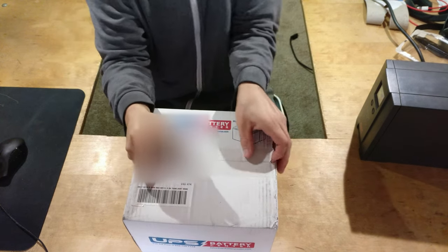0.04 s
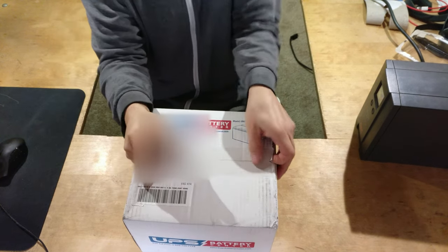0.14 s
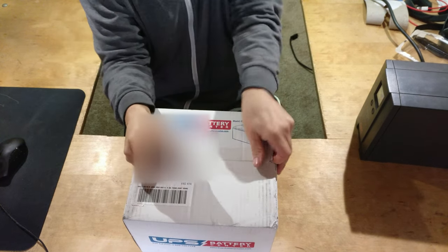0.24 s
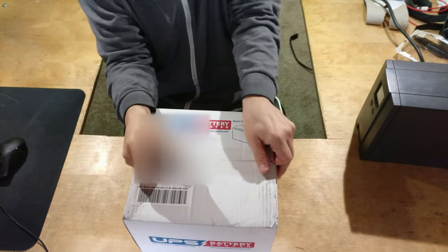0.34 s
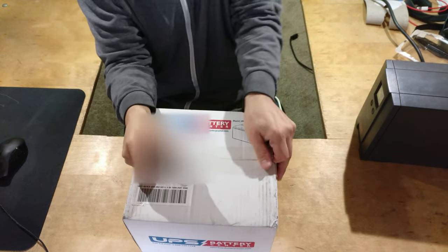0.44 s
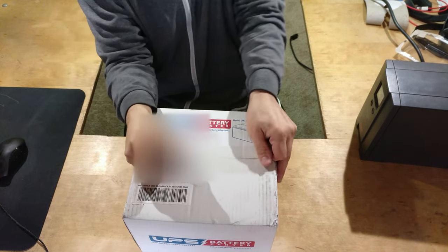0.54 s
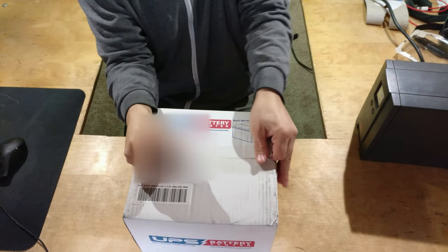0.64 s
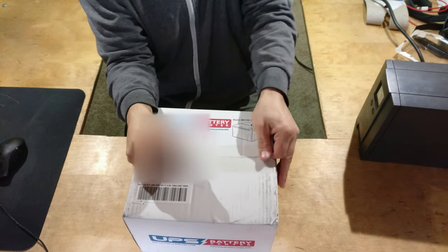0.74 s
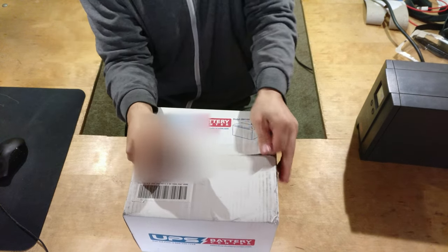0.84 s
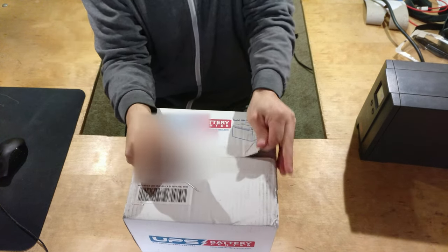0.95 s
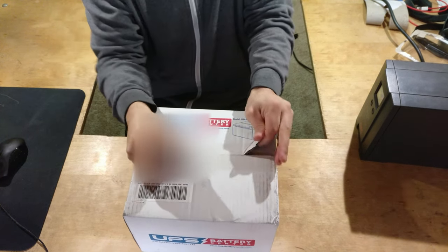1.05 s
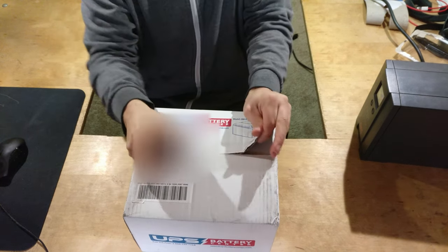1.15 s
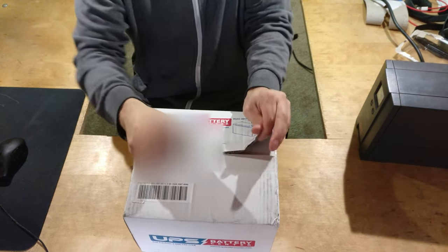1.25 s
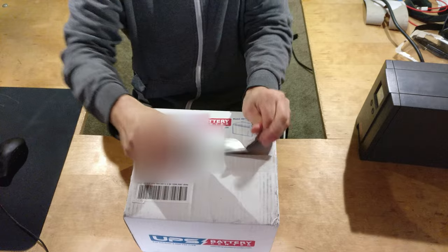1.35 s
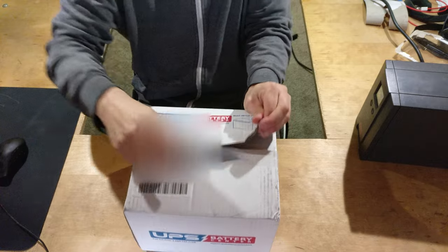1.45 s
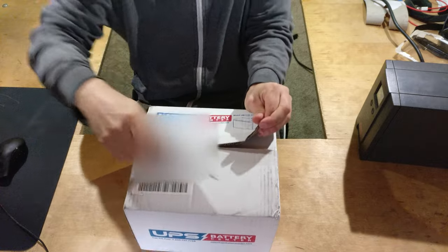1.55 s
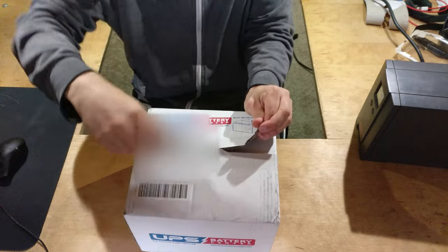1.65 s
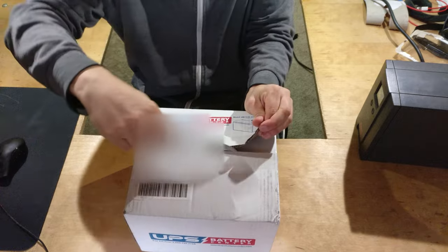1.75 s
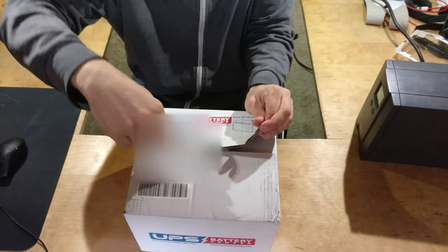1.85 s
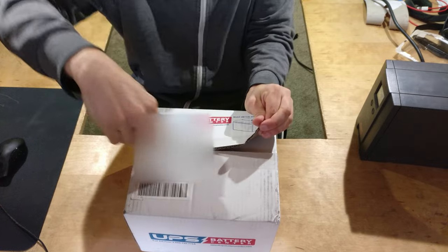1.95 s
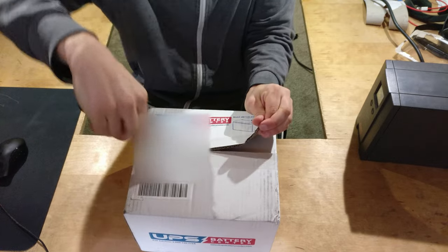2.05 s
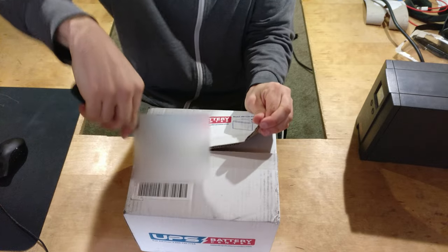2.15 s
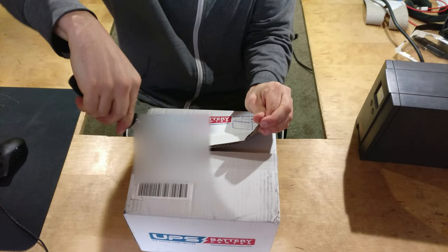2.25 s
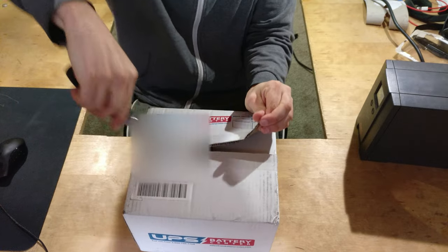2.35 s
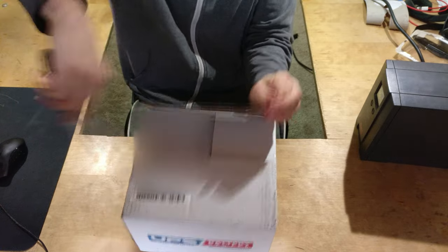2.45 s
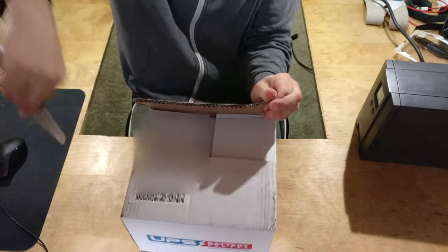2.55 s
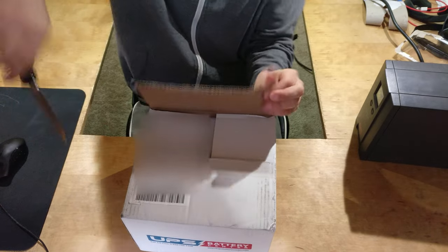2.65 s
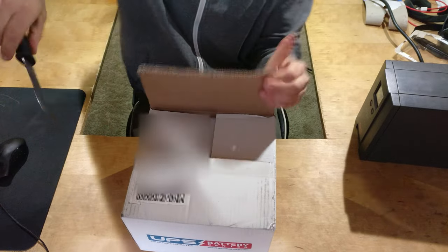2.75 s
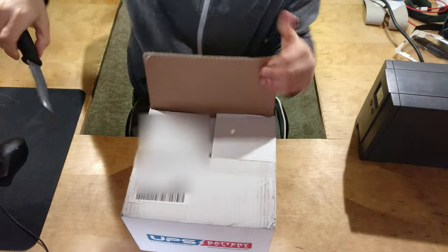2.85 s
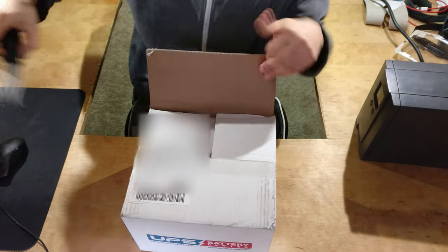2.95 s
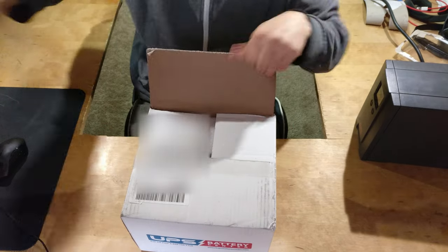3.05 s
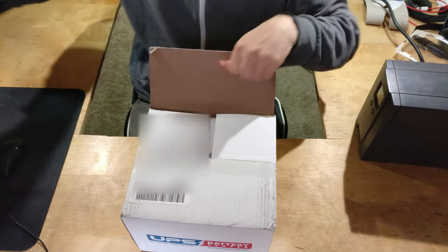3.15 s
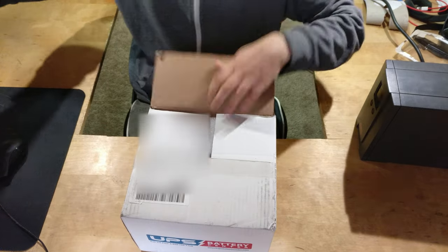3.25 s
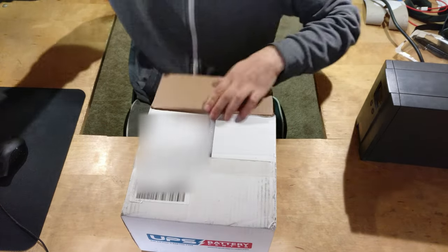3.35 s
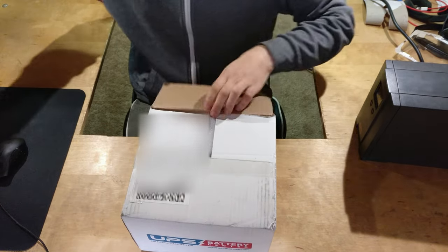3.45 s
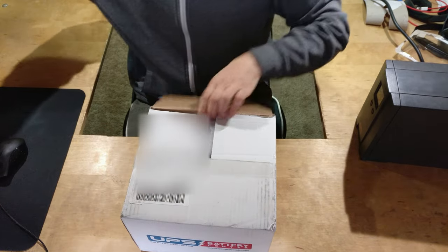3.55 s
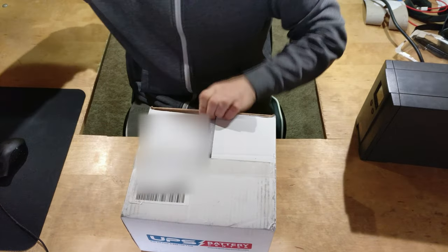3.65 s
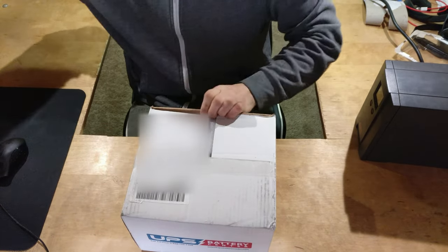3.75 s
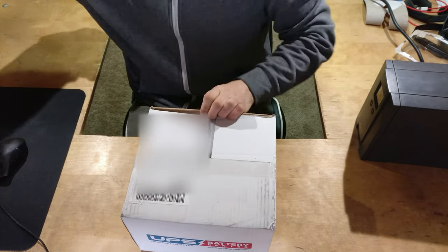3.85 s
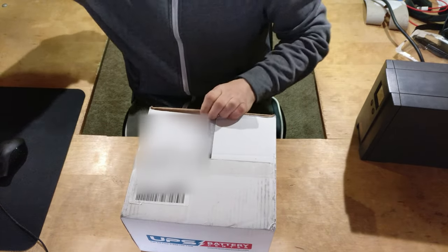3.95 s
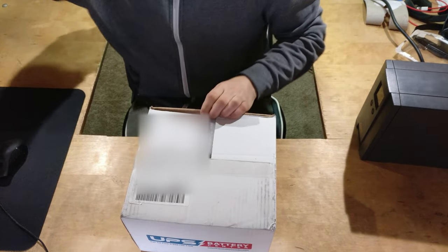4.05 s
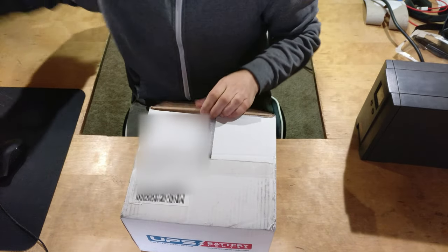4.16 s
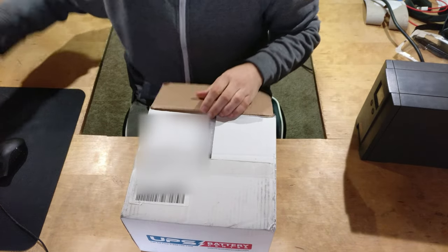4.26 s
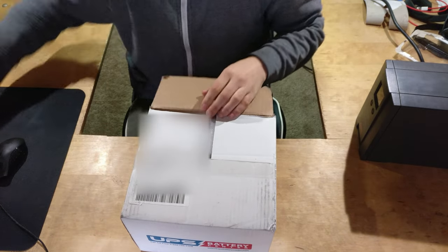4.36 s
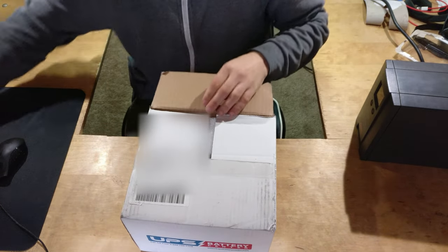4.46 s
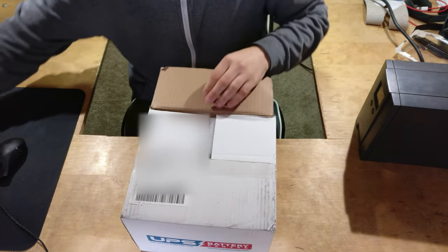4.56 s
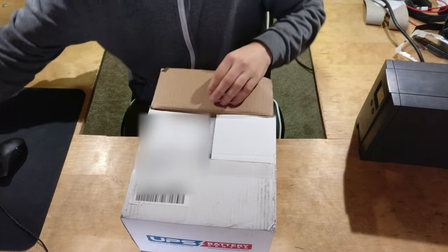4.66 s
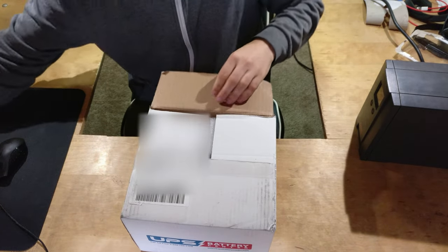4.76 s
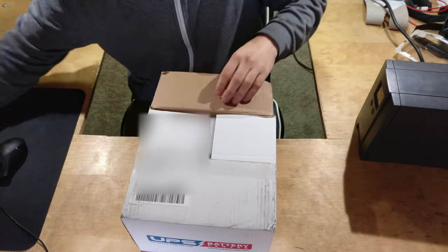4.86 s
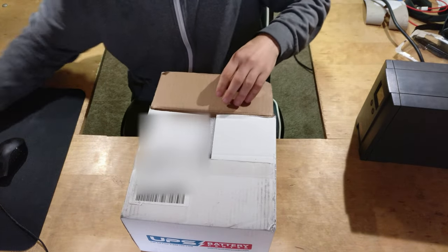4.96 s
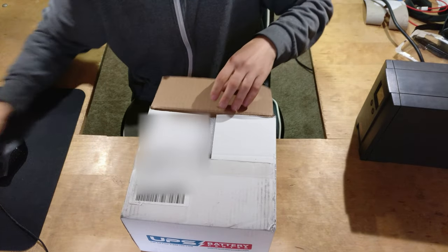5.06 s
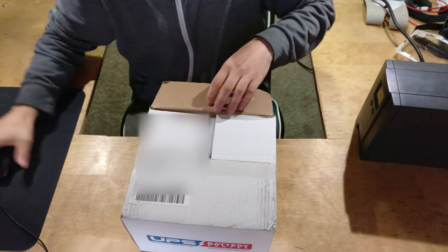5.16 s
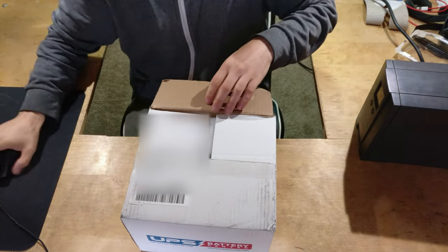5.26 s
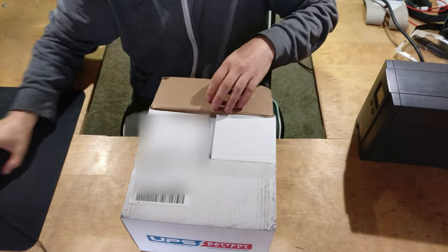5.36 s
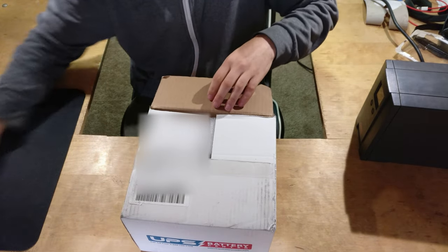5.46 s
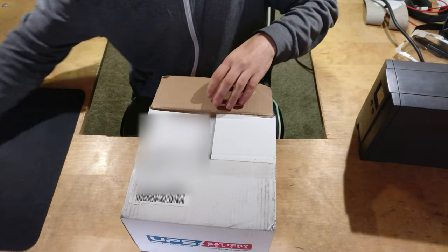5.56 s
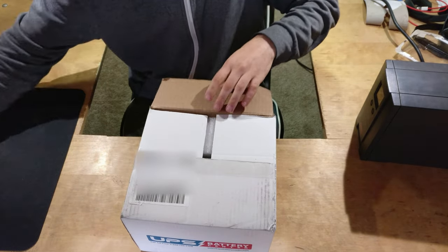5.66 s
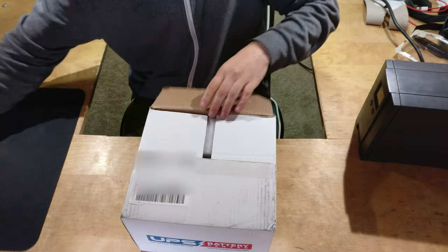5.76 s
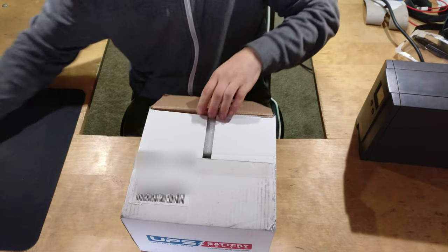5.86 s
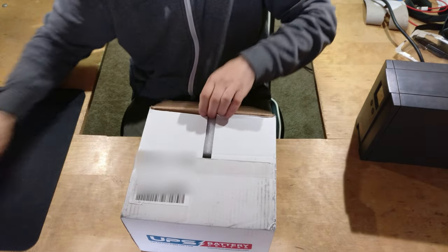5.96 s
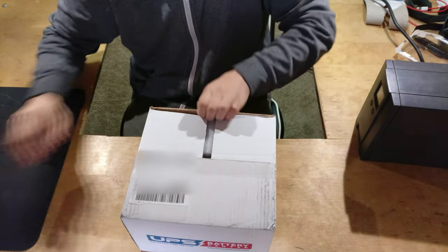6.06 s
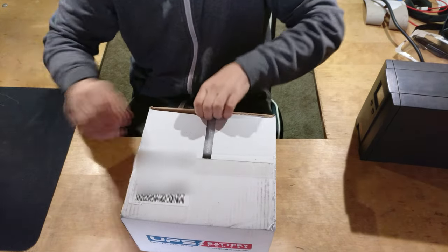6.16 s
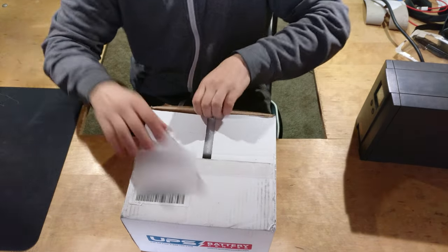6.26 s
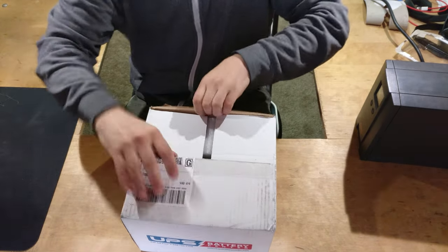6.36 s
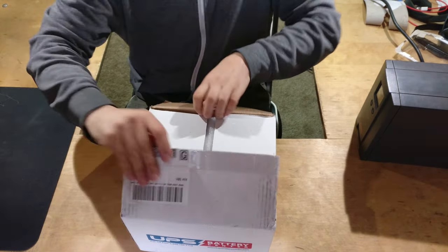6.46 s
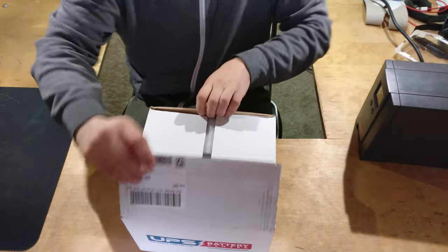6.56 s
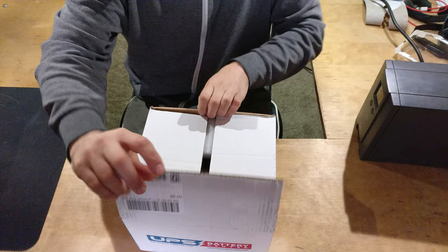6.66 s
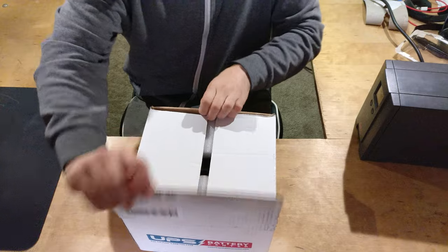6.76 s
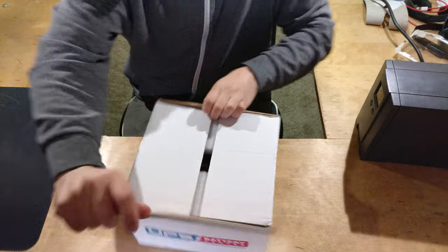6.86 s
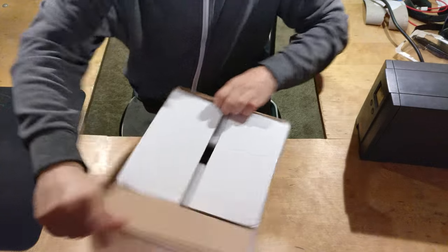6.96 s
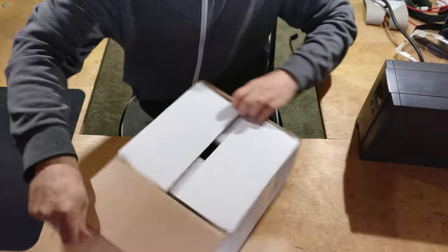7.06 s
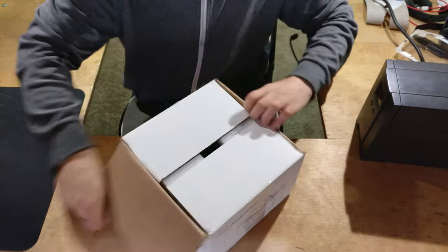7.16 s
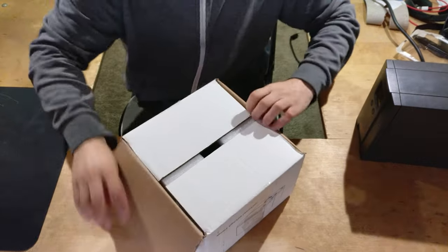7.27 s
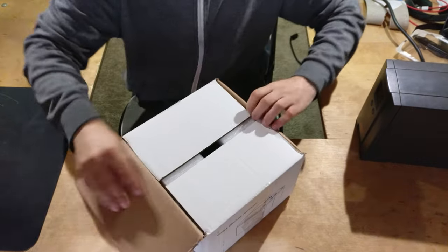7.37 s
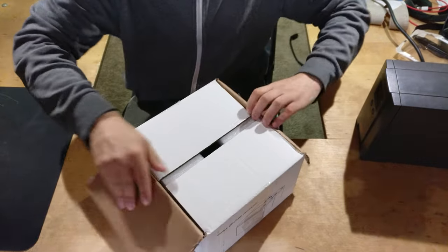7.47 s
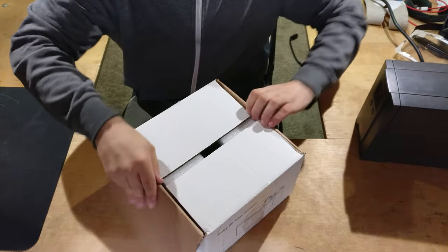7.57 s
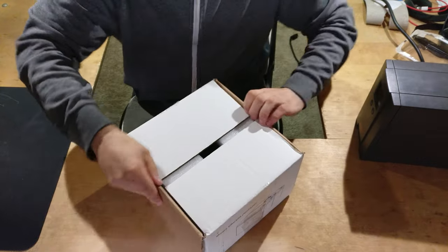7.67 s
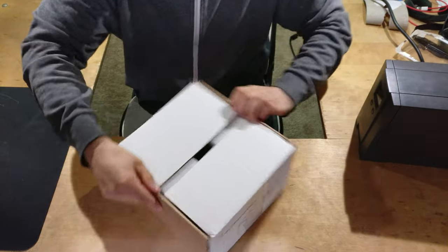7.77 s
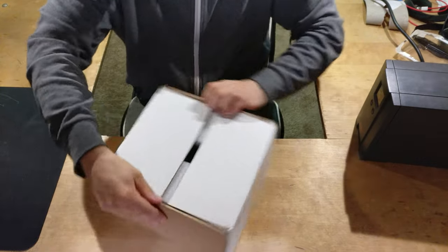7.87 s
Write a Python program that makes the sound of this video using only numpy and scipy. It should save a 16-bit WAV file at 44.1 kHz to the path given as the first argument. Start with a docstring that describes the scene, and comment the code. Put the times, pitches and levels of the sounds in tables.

```python
"""A faint hum and soft rubs over card come first; then hands tear and cut the tape of a box on a table.
Stick-slip friction of tape, blade and fingers makes dense clicks, a card-edge rasp and shaken walls.
Bumps excite the decaying modes of the hollow box and table; fibres and glue spots snap in short rings.
A small quiet room adds a short diffuse tail, and a thin tone fades in and out in a quiet stretch."""
import sys
import numpy as np
from scipy import signal
from scipy.fft import rfft, irfft
from scipy.io import wavfile
from scipy.ndimage import uniform_filter1d

SR = 44100
rng = np.random.default_rng(int(sys.argv[2]) if len(sys.argv) > 2 else 0)


def generate_wav(sig):
    """Save sig (samples, or channels by samples) to the path in sys.argv[1] as 16-bit PCM at SR."""
    pcm = np.round(np.clip(np.atleast_2d(sig).T, -1, 1) * 32767).astype(np.int16)
    wavfile.write(sys.argv[1], SR, pcm)


N = 349254
T = np.arange(N) / SR  # s
HZ = np.maximum(np.arange(N // 2 + 1) * SR / N, 1)  # spectrum bins


def undb(db):
    """Decibel law: amplitude gain of a level in dB."""
    return 10 ** (np.asarray(db) / 20)


def level(x, db):
    """Root-mean-square normalisation: scale to an rms level in dB."""
    return x * undb(db) / np.sqrt(np.mean(x ** 2))


def colour(x, points, scale=0.81):
    """Spectral shaping: scaled (pitch_hz, level_db) points are joined on a log-frequency axis."""
    hz, db = np.transpose(points)
    gain_db = scale * np.interp(np.log(HZ), np.log(hz), db)
    return irfft(rfft(x) * undb(gain_db), N)


def walk(rate):
    """Slow random modulation: levels drawn at a rate in Hz and joined by slews, spread near 1."""
    hold = int(SR / rate)
    steps = np.repeat(rng.standard_normal(N // hold + 1), hold)
    return 1.3 * uniform_filter1d(steps, hold)[:N]


def paths(size, alike):
    """Partial coherence: noise from a wide surface reaches the two ports only partly alike."""
    shared = rng.standard_normal(size)
    return alike * shared + np.sqrt(1 - alike ** 2) * rng.standard_normal((2, size))


def ring(gains, modes, t):
    """Modal superposition: a sum of decaying sines, the lows taking longer to build up."""
    hz, db, t60 = modes[:, :, None]
    build_up_cycles = np.where(hz < 150, 2.5, .6)
    swell = 1 - np.exp(-t * hz / build_up_cycles)
    decay = 1000. ** (-t / t60)
    sines = np.sin(2 * np.pi * hz * t)
    return np.sum(gains[:, None] * undb(db) * swell * decay * sines, axis=0)


HUM_HZ, HUM_DB = 118.4, -77.5  # rms before it wavers
AIR_DB = -69  # rms
# Spectrum of the room air: pitch_hz, level_db (relative, before the scale in colour)
AIR_SPECTRUM = [(18, -63.5), (40, -13.5), (118, -2.5), (179, -22), (280, -21), (461, -30.5), (889, -37),
                (1500, -36.5), (16000, -51.5)]


def quiet_room():
    """Background noise: air noise, coherent between ports in the bass, and a wavering tonal hum."""
    mid, side = (colour(rng.standard_normal(N), AIR_SPECTRUM) for _ in range(2))
    side = colour(side, [(200, -17.0), (2000, -1.0)])
    left_right = mid + side * np.array([[1], [-1]])
    air = level(left_right * undb(1.1 * walk(4.5)), AIR_DB)
    hum = level(np.sin(2 * np.pi * HUM_HZ * T), HUM_DB)
    return air + hum * undb(2.0 * walk(8.5))


TONE_HZ, TONE_WIDTH_HZ, TONE_DB = 1400, 65, -84  # rms before the fades
TONE_START_S, TONE_END_S = 4.22, 4.98


def thin_tone():
    """Resonant filtering: a narrow band of noise is heard as a thin tone that fades in and out."""
    peak = signal.iirpeak(TONE_HZ, TONE_HZ / TONE_WIDTH_HZ, fs=SR)
    band = signal.lfilter(*peak, rng.standard_normal(N))
    fade = np.clip(20 * np.minimum(T - TONE_START_S, TONE_END_S - T), 0, 1)
    return level(band, TONE_DB) * fade


ROOM_T60_S, ROOM_DB = 0.11, -5.5


def room(x):
    """Diffuse reverberation: each port gets its own decaying noise tail, mostly above the bass."""
    t = T[:SR // 4]
    tail = rng.standard_normal((2, len(t))) * 1000. ** (-t / ROOM_T60_S)
    tail = tail * (t > .0008)  # the reflections follow the direct sound
    tail = signal.sosfilt(signal.butter(1, 500, "high", fs=SR, output="sos"), tail)
    tail = tail / np.sqrt(np.sum(tail ** 2, axis=1, keepdims=True))
    return undb(ROOM_DB) * signal.fftconvolve(x[None], tail, axes=1)[:, :N]


# Snapping fibres and glue spots: start_s, level_db (peak of the ring, without the tick), pitch_hz, t60_s
SNAPS = [(0.9495, -24, 7100, 0.006), (1.272, -31, 1600, 0.012), (1.285, -32, 1720, 0.0052),
         (1.5345, -24, 1884, 0.017), (2.198, -24, 1700, 0.011), (2.241, -26.5, 1510, 0.036),
         (2.5155, -5, 7460, 0.0027), (2.516, -13.5, 1923, 0.035), (3.213, -36, 2230, 0.015),
         (4.254, -55, 751, 0.017), (4.476, -61, 1406, 0.016), (5.294, -55, 1700, 0.02),
         (6.622, -29, 1980, 0.026), (6.633, -25.5, 2070, 0.023)]


def snaps():
    """Sudden release: the card gives way in a tick and rings roughly and briefly around it."""
    out, t = np.zeros((2, N + SR)), T[:SR // 16]
    for start_s, db, hz, t60 in SNAPS:
        give = paths(len(t), 0.83) * np.exp(-t / (0.12 * t60))
        card = 1000. ** (-t / t60) * np.sin(2 * np.pi * hz * t)
        sound = signal.fftconvolve(give, card[None], axes=1)[:, :len(t)]
        tick = 0.19 * paths(len(t), 0.9) * np.exp(-t / 0.0005)
        sound = sound / np.abs(sound).max() + tick
        start = int(start_s * SR)
        out[:, start:start + len(t)] += undb(db) * sound
    return out[:, :N]


# Modes of box and table, air and table below 400 Hz, card panels above:
# pitch_hz (nominal), level_db (relative), t60_s (for bumps; rubbing shortens it)
BODY = [(47.4, -11, 0.3), (61, -2.5, 0.3), (88.2, -7.5, 0.27), (107.53, 3, 0.29), (140, -13.5, 0.13),
        (193, -4.5, 0.11), (239, 1, 0.065), (296.6, -7, 0.067), (442, -8.5, 0.068), (505, -5.5, 0.045),
        (583, -1.5, 0.045), (647, -1.5, 0.045), (796, -8.5, 0.044), ]


def box_modes():
    """Modal description: a fresh copy of the pitches, levels and decays of the box and table."""
    return np.array(BODY, dtype=float).T


CRACK_DB, CRACK_PER_PANEL = -24.5, 1  # a blow that rings the panels also cracks
# Bumps of the box: start_s, thud_db (peak before the stop), panel_db (ring peak above the thud, before
# the stop), stop_s (time after the start at which the ring drops), pitch_hz (centre of the thud)
BUMPS = [(0.68, -46.5, -5.5, 0.044, 190), (0.732, -42.5, 0, 0.061, 189.3), (0.91, -10, -3.5, 0.019, 200),
         (0.946, -26, -12, 0.021, 167.5), (1.027, -44.5, -14, 0.091, 170), (1.174, -33, 4, 0.059, 190),
         (1.265, -33, -13, 0.027, 195), (1.535, -32, 5.5, 0.022, 169), (1.703, -46.5, -16, 0.048, 197),
         (1.862, -11, -9.5, 0.035, 199), (1.907, -16, -3, 0.099, 174.6), (2.049, -24.5, -27, 0.17, 181),
         (2.115, -19, -6.5, 0.16, 180.6), (2.142, -10.5, -17, 0.041, 193), (2.168, -17.5, -5, 0.23, 177),
         (2.199, -19.5, -13, 0.099, 180), (2.236, -18.5, -19, 0.091, 118.5), (2.304, -25, -15, 0.26, 162),
         (2.422, -20.5, -18, 0.16, 183.7), (2.446, -13.5, 1, 0.19, 206.8), (2.514, -9, -0.5, 0.18, 152.2),
         (2.539, -11, -2, 0.11, 106), (2.747, -39, 1.5, 0.056, 139), (3.184, -25.5, -12.5, 0.048, 100),
         (3.213, -19.5, -7, 0.026, 300), (3.385, -28, -7, 0.096, 105), (3.397, -26.5, -24, 0.068, 160),
         (3.633, -31, -4, 0.042, 133), (4.805, -30, -25, 0.075, 240), (4.826, -25, -32.5, 0.084, 146),
         (5.179, -58, -12, 0.05, 140.8), (5.293, -48, -20.5, 0.15, 85.3), (5.776, -29, -37, 0.14, 196),
         (6.092, -49, -5, 0.094, 121), (6.404, -29, 2, 0.045, 106), (6.457, -17.5, -20, 0.014, 100),
         (6.568, -23.5, -7, 0.1, 109), (6.616, -24.5, 1, 0.11, 116), (6.638, -32, 2, 0.017, 109),
         (6.649, -22.5, -24.5, 0.055, 62.7), (7.059, -28, 1.5, 0.093, 100), (7.41, -25, -3.5, 0.019, 105),
         (7.572, -26.5, -10, 0.08, 104.6), (7.797, -39.5, 2, 0.026, 201)]


def bumps():
    """Modal impact: a blow favours low modes near its centre, crunches the panels and cracks the card."""
    out, t = np.zeros((2, N + SR)), T[:SR // 4]
    for start_s, thud_db, panel_db, stop_s, centre_hz in BUMPS:
        modes = box_modes()
        count = modes.shape[1]
        low, deep = modes[0] < 400, modes[0] < 125
        # hands and open flaps retune the panels from blow to blow
        modes[0] *= 1 + np.where(low, .012, .04) * rng.standard_normal(count)
        chance = undb(np.where(low, 1.5, 2.2) * rng.standard_normal(count))
        chance = chance * np.where(low, 1, rng.choice([-1, 1], count))
        near = undb(-9 * np.abs(np.log2(modes[0] / centre_hz)))
        # soft blows hardly reach the highest panel modes
        chance = chance * undb(0.7 * min(panel_db, 0) * (modes[0] > 750))

        # the hand keeps rocking the walls for a moment; the deepest modes only feel the blow
        hand = uniform_filter1d(rng.standard_normal(len(t)), SR // 600)
        rocking = (t == 0) + 0.035 * hand * np.exp(-t / 0.048)
        thud = signal.fftconvolve(rocking, ring(chance * near * (low & ~deep), modes, t))[:len(t)]
        thud = thud + ring(chance * near * deep, modes, t)

        # the card gives way over some ms, so the panels are driven by a rough burst
        crunch = paths(len(t), 0.84) * (np.exp(-t / 0.0033) + 0.3 * np.exp(-t / 0.022))
        panel_ring = ring(chance * ~low, modes, t)
        panel = signal.fftconvolve(crunch, panel_ring[None], axes=1)[:, :len(t)]

        crack_decay = np.exp(-t / 0.00058) + 0.052 * np.exp(-t / 0.039)
        crack = np.diff(paths(len(t) + 1, 0.88)) * crack_decay
        crack_db = CRACK_DB + CRACK_PER_PANEL * panel_db

        sound = thud / np.abs(thud).max() + undb(panel_db) * panel / np.abs(panel).max()
        sound = sound + undb(crack_db) * crack
        # the ring dies suddenly to a faint rest
        stopped = 0.027 + 0.54 / (1 + np.exp((t - stop_s) / 0.0019))
        fade_out = np.minimum(1, 20 * (t[-1] - t))
        start = int(start_s * SR)
        out[:, start:start + len(t)] += undb(thud_db) * sound * stopped * fade_out
    return out[:, :N]


TEAR_DB_PER_S = 799.5
# Tape and card letting go: start_s, level_db (peak force), top_db (treble above 7500 Hz, relative)
TEARS = [(0.45, -56, -0.5), (0.873, -56, -3.5), (0.911, -25, 4.5), (0.948, -37.5, 6.5), (1.262, -42.5, -15),
         (1.361, -46, -2.5), (1.451, -45, -5), (1.497, -56.5, 12), (1.532, -33.5, 2), (1.861, -51.5, -22),
         (1.909, -48.5, -20), (2.116, -48.5, -7), (2.197, -39, 6), (2.307, -46.5, -1), (2.422, -35, 0),
         (2.442, -27, 0), (2.507, -28.5, -8), (2.514, -20.5, -5), (2.747, -49, -5), (3.211, -57, 8),
         (3.377, -52.5, -11.5), (3.767, -52.5, 5), (6.405, -49.5, -10), (6.456, -43.5, -1),
         (6.619, -55, 11), (6.78, -59.5, 29.5), (6.956, -50.5, -6), (7.059, -35.5, -4), (7.407, -46, -5),
         (7.797, -53, -17)]


def tears():
    """Sudden failure: the force peaks at once, then decays exponentially."""
    for start_s, db, top_db in TEARS:
        now = slice(int(start_s * SR), int(start_s * SR) + SR // 8)
        yield now, undb(db - TEAR_DB_PER_S * (T[now] - start_s)), top_db


SWELL_DB, SWELL_SHARE, RELEASE_DB_PER_S = 14, 0.41, 498  # share of the rub's duration
# Tape, blade and fingers dragged over the card: start_s, end_s, level_db (held force),
# top_db (treble above 7500 Hz, relative)
RUBS = [(0.113, 0.229, -66, 3.5), (0.259, 0.332, -58.5, -1), (0.384, 0.645, -72.5, -5),
        (1.032, 1.094, -61, -6), (1.16, 1.232, -48, -3), (1.259, 1.291, -40.5, 1.5),
        (1.501, 1.539, -51, -11), (1.97, 2.173, -58, -2.5), (2.164, 2.256, -41.5, 1),
        (2.315, 2.341, -49.5, -1.5), (2.385, 2.41, -56.5, -2), (2.436, 2.533, -35.5, -5.5),
        (2.5, 2.572, -41, -13.5), (2.614, 2.663, -62.5, -7), (2.92, 3.157, -73, -4),
        (3.166, 3.265, -54.5, -7), (3.254, 3.293, -46.5, 4), (3.321, 3.376, -60.5, 1),
        (3.375, 3.4, -54.5, 0), (3.439, 3.495, -61.5, 5), (3.598, 3.696, -60.5, -1),
        (3.688, 3.737, -54, 0.5), (3.738, 3.837, -63.5, 2.5), (4.16, 4.486, -75, 2), (4.742, 4.916, -73, 1),
        (5.146, 5.35, -76.5, 1), (5.606, 5.677, -83, -13), (5.755, 5.838, -75, -3),
        (5.914, 6.059, -67.5, 2), (6.078, 6.122, -66, -3.5), (6.382, 6.498, -56, -3.5),
        (6.519, 6.64, -57.5, -2.5), (6.61, 6.627, -38.5, -5.5), (6.736, 6.777, -60, -4),
        (6.784, 6.965, -63.5, 0.5), (6.913, 7.066, -59, 2.5), (7.014, 7.254, -51.5, 1),
        (7.284, 7.417, -51, 5), (7.472, 7.616, -61, 0), (7.624, 7.794, -64, -7.5), (7.795, 7.933, -49, 1.5)]


def rubs():
    """Sliding contact: the force of a rub swells, holds, then lets go."""
    for start_s, end_s, db, top_db in RUBS:
        now = slice(int(start_s * SR), int(end_s * SR) + SR // 8)
        swell = np.maximum(1 - (T[now] - start_s) / (SWELL_SHARE * (end_s - start_s)), 0)
        release_s = np.maximum(T[now] - end_s, 0)
        yield now, undb(db - SWELL_DB * swell - RELEASE_DB_PER_S * release_s), top_db


def pressure():
    """Superposed contact forces: forces add, and the brightness is their force-weighted mean in dB."""
    force, top = np.full(N, 1e-6), np.zeros(N)
    for strokes in (tears(), rubs()):
        for now, push, top_db in strokes:
            force[now] += push
            top[now] += push * top_db
    force, bright = uniform_filter1d(np.array([force, undb(top / force)]), SR // 350)  # set in within 3 ms
    fade = np.exp(-1 / (0.013 * SR))
    lingering = signal.lfilter([1 - fade], [1, -fade], force)
    return np.maximum(force, 0.42 * lingering), bright  # strokes let go more slowly


# How the strokes bear on the box: start_s, push_db (on the walls), rasp_db (of the card edge), both relative
GRIP = [(0, -2, -6), (1.1, -5.5, -3), (1.9, -9, -3.5), (2.0, 12, -9), (2.4, 10.5, -3), (2.5, 2, -7),
        (6.4, 2, -3), (6.9, -4, -1.5), (7.75, -4, -2), (7.84, -14.5, 1.5)]


def grip():
    """Contact coupling: slowly changing gains of the push on the walls and of the card-edge rasp."""
    start_s, push_db, rasp_db = np.transpose(GRIP)
    return undb(np.interp(T, start_s, push_db)), undb(np.interp(T, start_s, rasp_db))


def patchy(x):
    """Independent band modulation: each octave swells alone as the contact moves over the fibres."""
    out, rest = 0, x
    for hz in 800 * 2 ** np.arange(5):
        band = signal.sosfilt(signal.butter(1, hz, fs=SR, output="sos"), rest)
        out = out + band * undb(2.4 * walk(16))
        rest = rest - band
    return out + rest


# Spectrum of the scraped card: pitch_hz, level_db (relative, before the scale in colour)
SCRAPE_SPECTRUM = [(240, -20), (400, -11.5), (636, -8.5), (964, -9), (1900, -2), (2510, -7), (4800, -8.5),
                   (9470, -18.5), (12500, -23), (16000, -18)]


def slipping(bright):
    """Stick-slip friction: dense clicks of uneven size in uneven bursts hiss directly."""
    sizes = undb(4.5 * np.minimum(rng.exponential(size=N), 3.5))
    clicks = (rng.random(N) < 1200 / SR) * sizes  # 1200 per s on average
    slips = level(clicks * paths(N, 0.61), 0) + 1.1 * paths(N, 0.6)
    slips = patchy(colour(slips, SCRAPE_SPECTRUM)) * undb(2.0 * walk(110))
    top = signal.sosfiltfilt(signal.butter(3, 7500, "high", fs=SR, output="sos"), slips)
    return level(slips - top, 1.8) + bright * level(top, 0.077)


CATCHES_PER_S = 350  # on average, in each band
RASP_WIDTH, RASP_WANDER = 0.42, 0.08  # shares of the pitch
# Bands of the ringing card edge: pitch_hz (centre of the wander), level_db (relative, before it wavers)
RASP_BANDS = [(750, -5.5), (1400, -2), (2080, -0.5), (2850, -4), (4100, -1.5), (5900, -7)]


def rasp():
    """Impulsive excitation: fibres catch and ring the card edge a few cycles in wandering bands."""
    out = 0
    for hz, db in RASP_BANDS:
        phase = 2 * np.pi * np.cumsum(hz * (1 + RASP_WANDER * walk(9))) / SR
        sizes = undb(5.2 * np.minimum(rng.exponential(size=N), 3))
        catches = (rng.random(N) < CATCHES_PER_S / SR) * sizes
        grains = level(catches * paths(N, 0.93), 0) + 0.53 * paths(N, 0.9)
        span = int(SR / (RASP_WIDTH * hz))
        flutter = uniform_filter1d(uniform_filter1d(grains, span), span // 2)
        out = out + level(flutter, db) * np.sin(phase) * undb(2.2 * walk(25))
    return level(out, 0)


def shaken_walls(force, bright, push):
    """Forced modal response: random shoves of the strokes drive the modes of the box walls."""
    shoves_per_s = 900
    shoves = (rng.random(N) < shoves_per_s / SR) * rng.standard_normal(N)
    # dull strokes press harder and push the walls more
    shoves = shoves * force * bright ** -.9 * push
    modes = box_modes()
    gains = np.where(modes[0] < 400, 1, .7)
    modes[2] *= .6  # shorter decays than under a bump
    walls = ring(gains, modes, T[:SR // 4])
    walls = walls / np.sqrt(np.sum(walls ** 2) * shoves_per_s / SR)
    return undb(1.0) * signal.fftconvolve(shoves, walls)[:N]


def rubbing():
    """Friction-driven radiation: contact force scales the hiss and rasp, and shakes the box walls."""
    force, bright = pressure()
    push, rasp_gain = grip()
    scrape = slipping(bright) + rasp_gain * rasp()
    return scrape * force + shaken_walls(force, bright, push)


LEFT_LAG, PORT_SHARE = 4, .5  # samples; half the port difference goes to each side
# Difference between the ports: pitch_hz, level_db (left minus right, before the scale in colour)
PORTS = [(60, -1), (110, 1), (300, -1.5), (700, 1.5), (1290, 0), (2380, 0), (4400, -0.5), (8120, -10),
         (15000, -11.5)]


def scene():
    """Interaural-type differences: the box is nearer the right port, whose treble is also stronger."""
    left, right = rubbing() + bumps() + snaps()
    direct = np.array([np.roll(left, LEFT_LAG), right])
    left, right = direct + room((left + right) / 2)
    box = np.array([colour(left, PORTS, PORT_SHARE * 0.81 / 0.81), colour(right, PORTS, -PORT_SHARE)])
    return box + quiet_room() + thin_tone()


TOP_HZ = 15800


def record(dry):
    """Band limiting and soft saturation: lose the deepest bass, round the loudest peaks, cut the top."""
    dry = signal.sosfilt(signal.butter(2, 35, "high", fs=SR, output="sos"), dry)
    rounded = np.tanh(dry)
    return signal.sosfilt(signal.ellip(10, .2, 80, TOP_HZ, fs=SR, output="sos"), rounded)


dry = scene()
out = record(dry)
generate_wav(out)
```